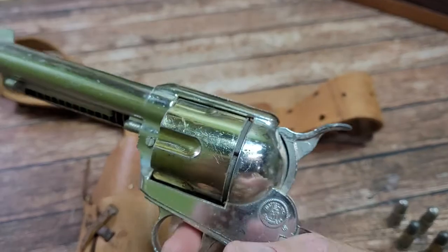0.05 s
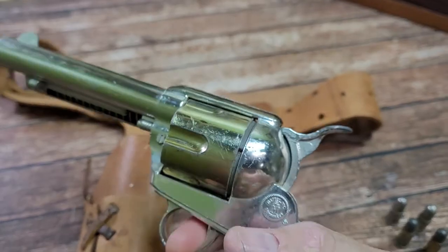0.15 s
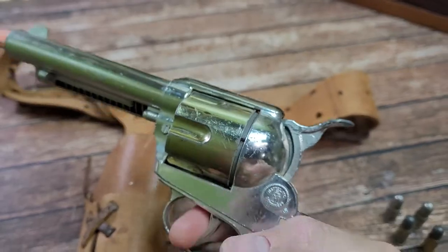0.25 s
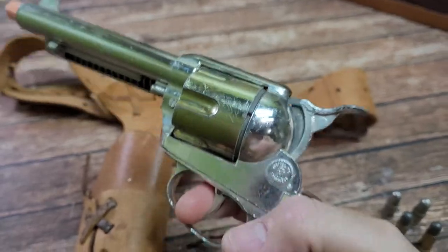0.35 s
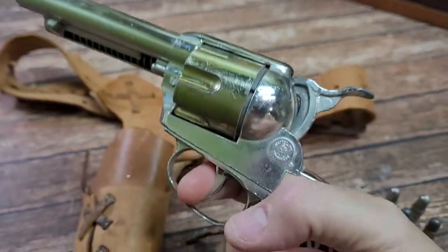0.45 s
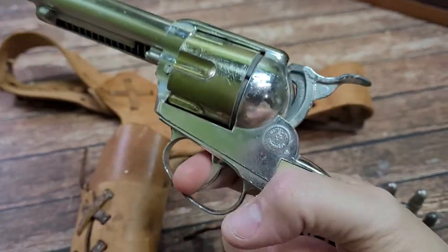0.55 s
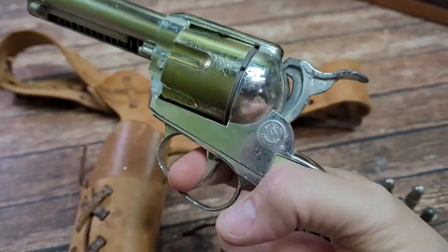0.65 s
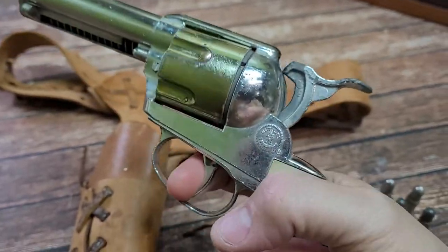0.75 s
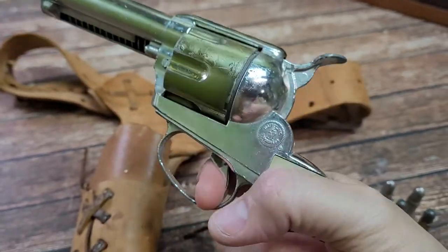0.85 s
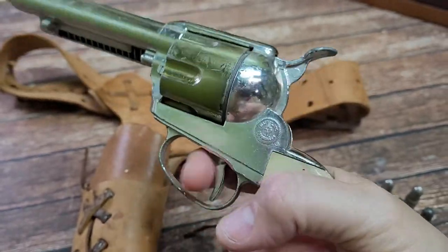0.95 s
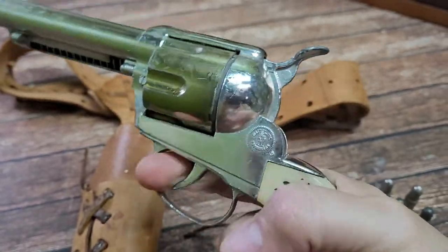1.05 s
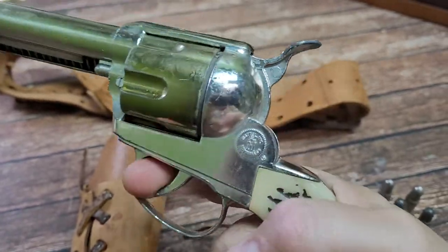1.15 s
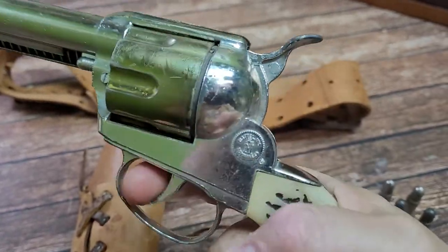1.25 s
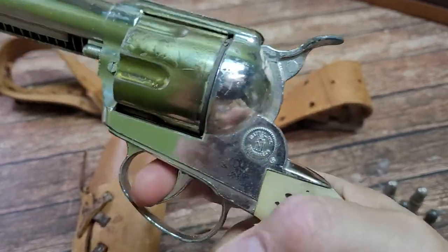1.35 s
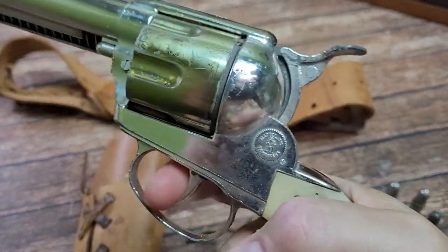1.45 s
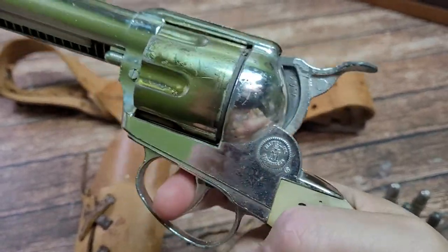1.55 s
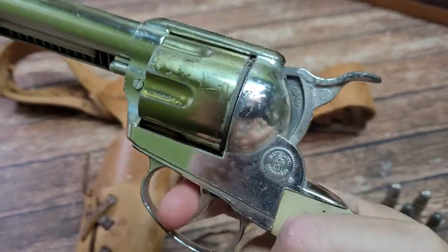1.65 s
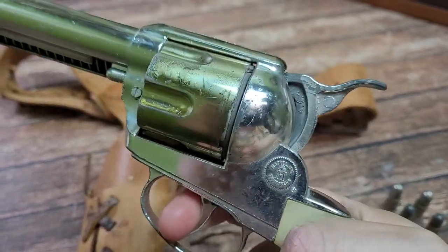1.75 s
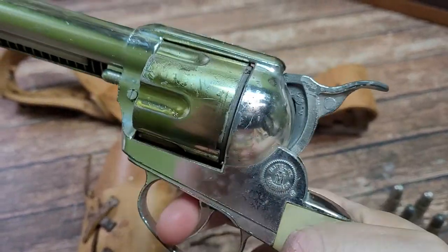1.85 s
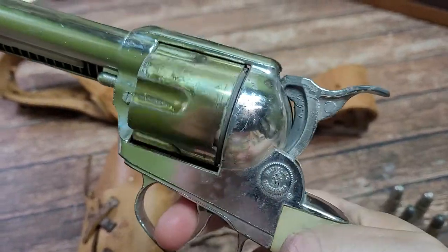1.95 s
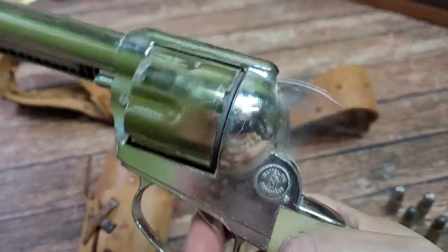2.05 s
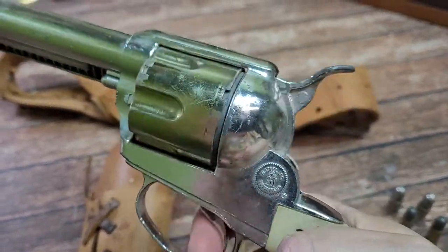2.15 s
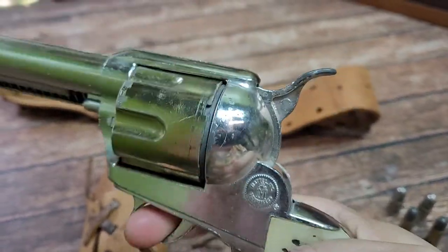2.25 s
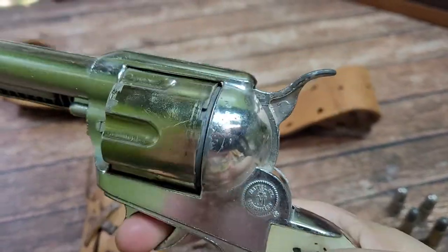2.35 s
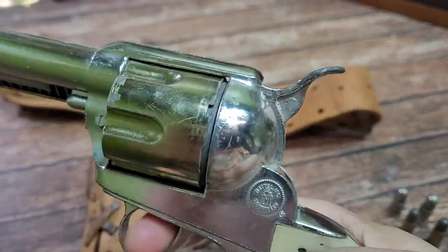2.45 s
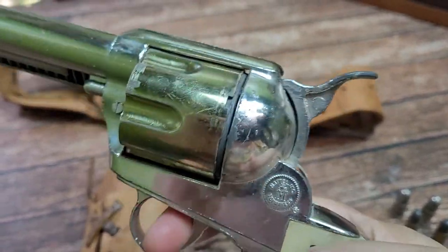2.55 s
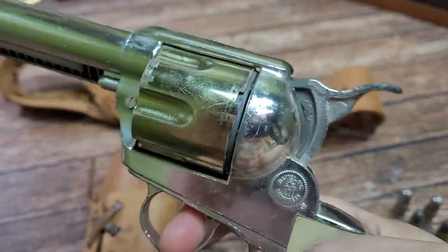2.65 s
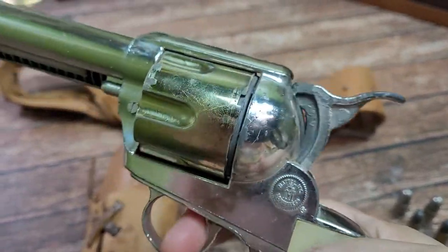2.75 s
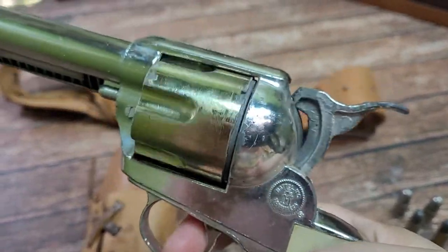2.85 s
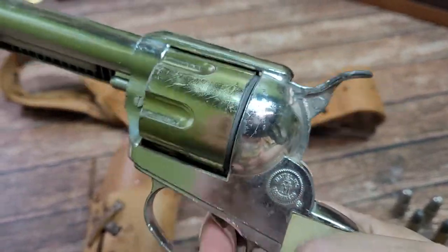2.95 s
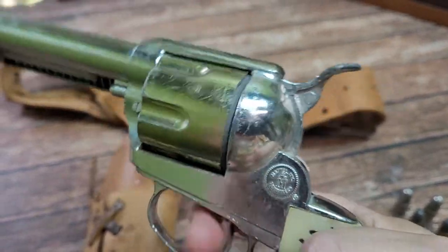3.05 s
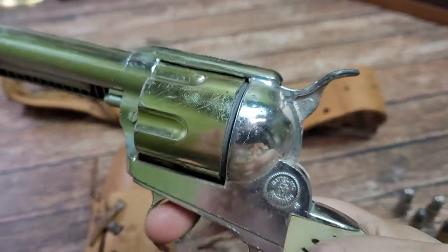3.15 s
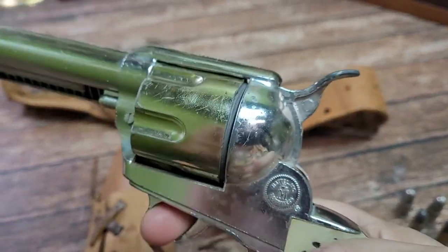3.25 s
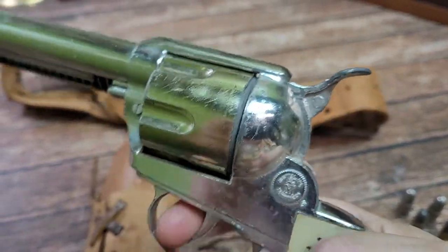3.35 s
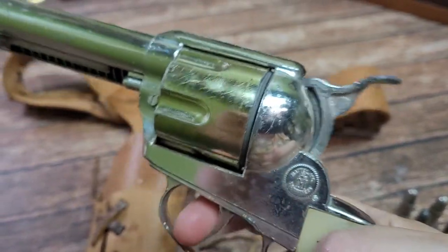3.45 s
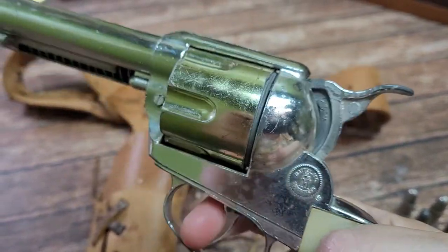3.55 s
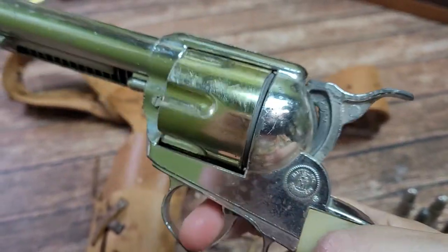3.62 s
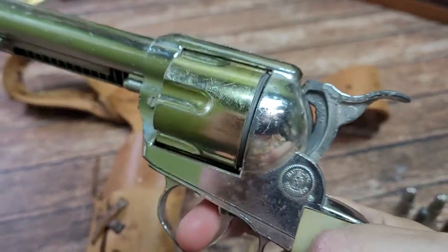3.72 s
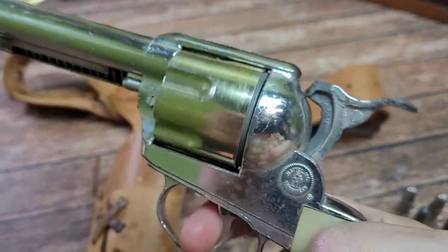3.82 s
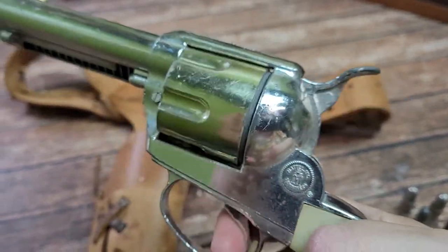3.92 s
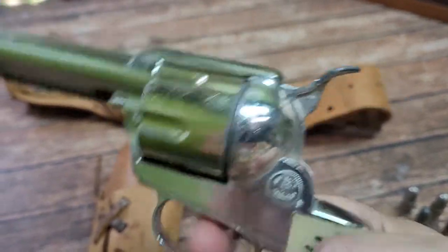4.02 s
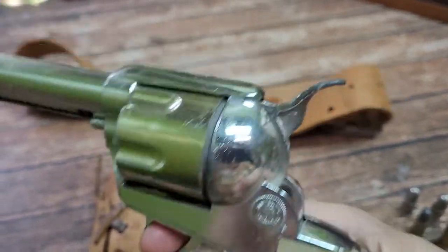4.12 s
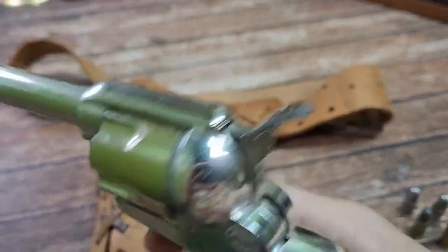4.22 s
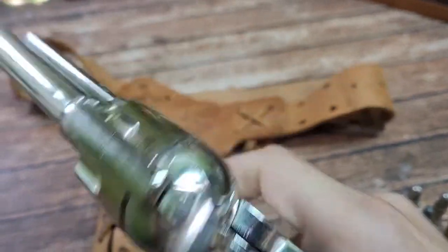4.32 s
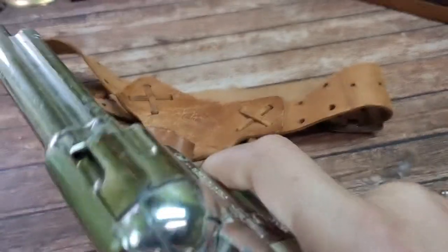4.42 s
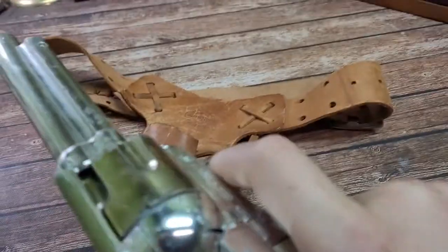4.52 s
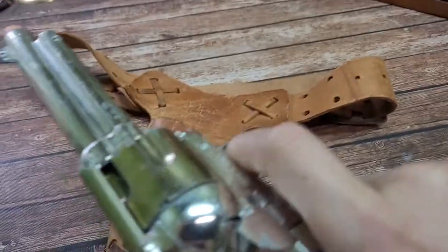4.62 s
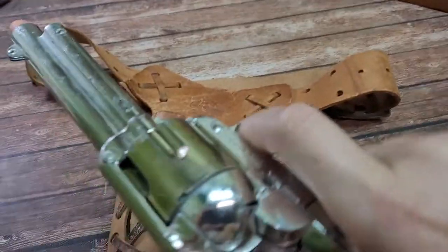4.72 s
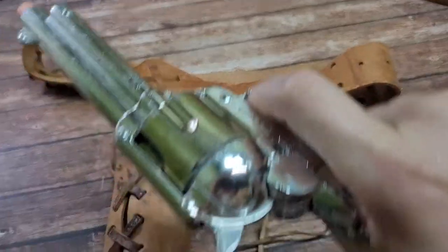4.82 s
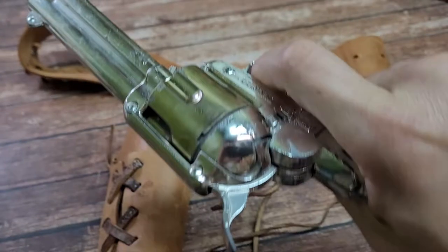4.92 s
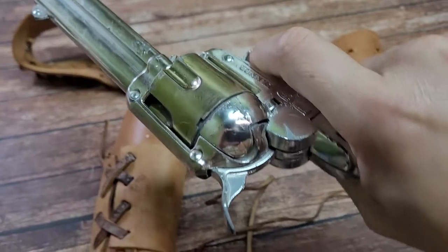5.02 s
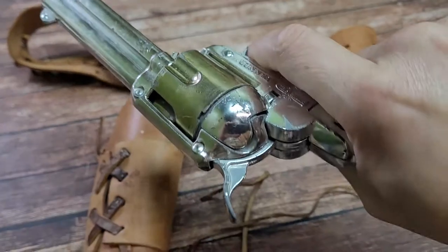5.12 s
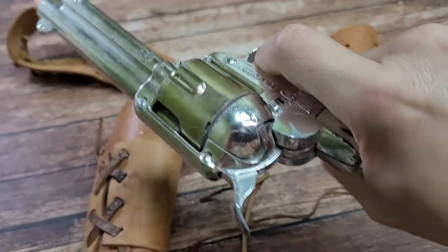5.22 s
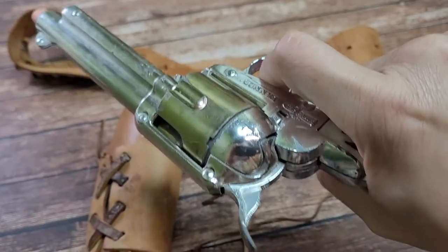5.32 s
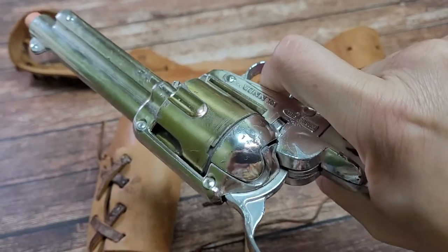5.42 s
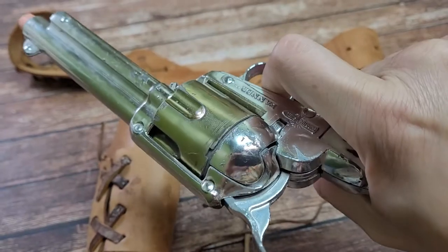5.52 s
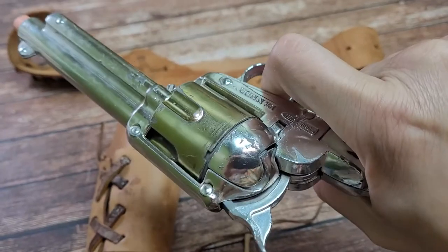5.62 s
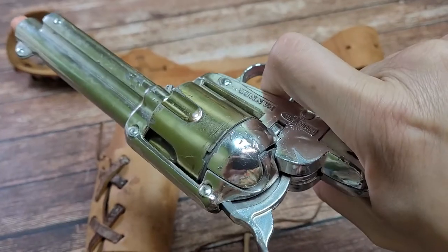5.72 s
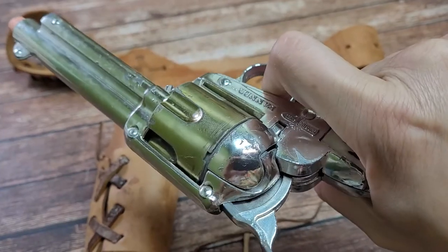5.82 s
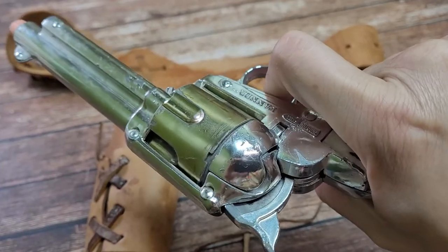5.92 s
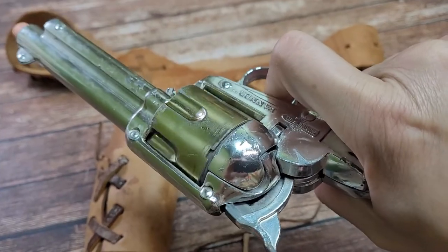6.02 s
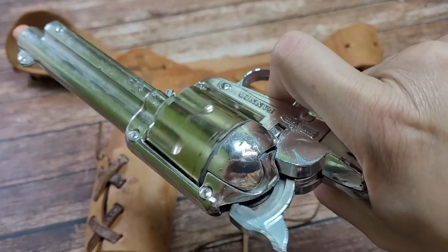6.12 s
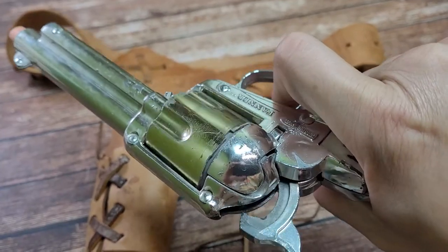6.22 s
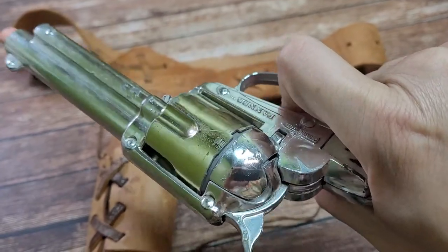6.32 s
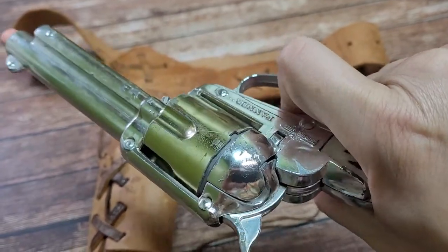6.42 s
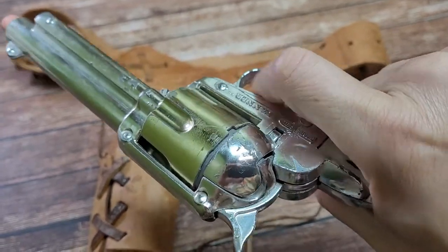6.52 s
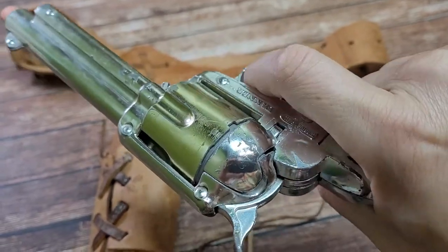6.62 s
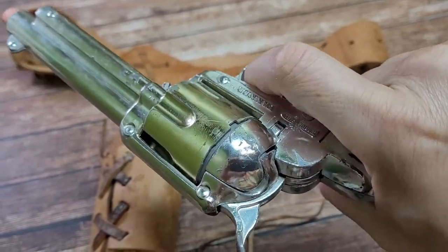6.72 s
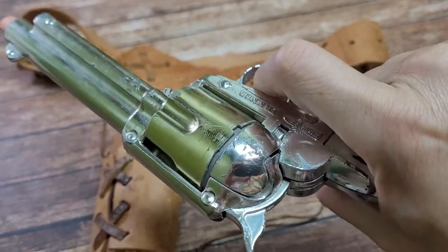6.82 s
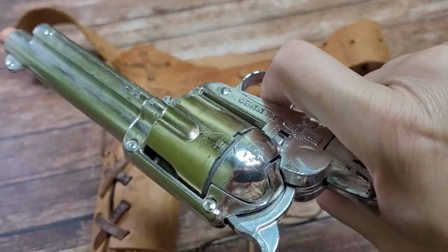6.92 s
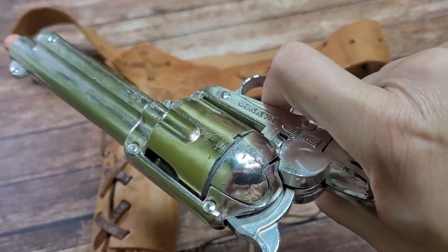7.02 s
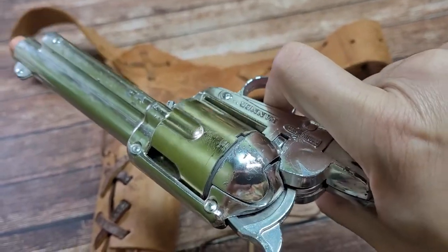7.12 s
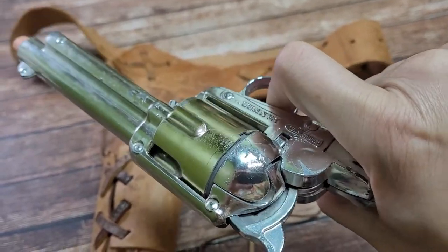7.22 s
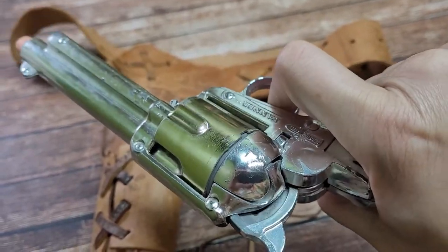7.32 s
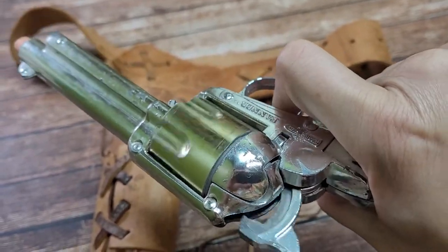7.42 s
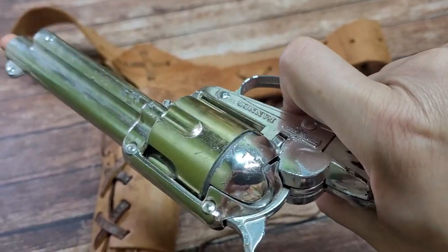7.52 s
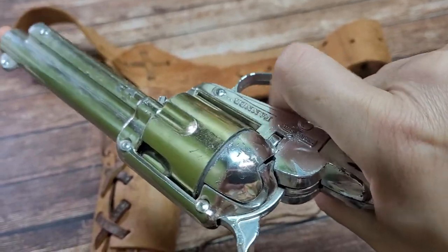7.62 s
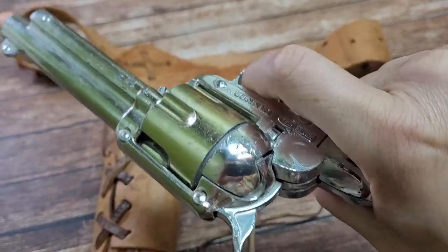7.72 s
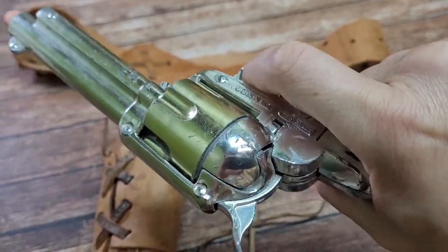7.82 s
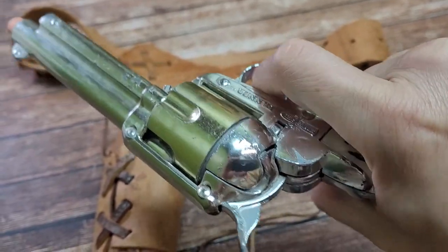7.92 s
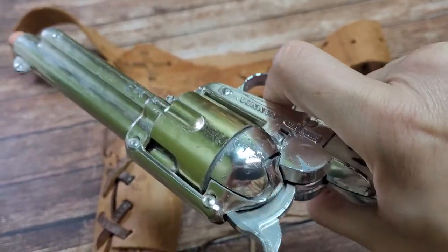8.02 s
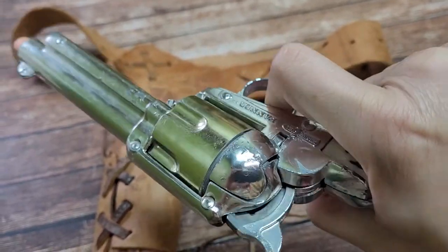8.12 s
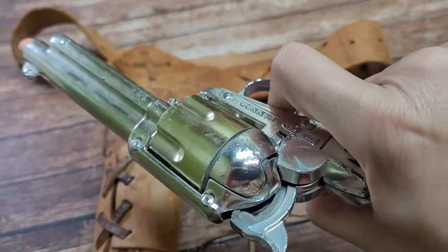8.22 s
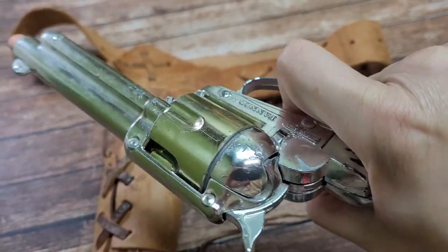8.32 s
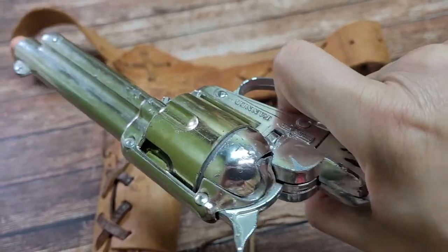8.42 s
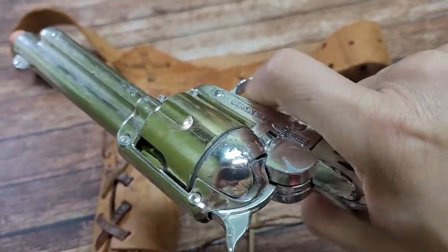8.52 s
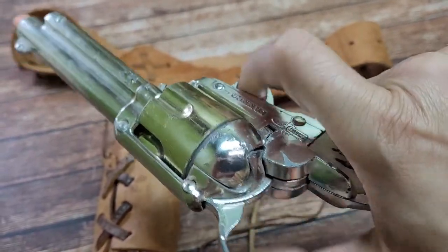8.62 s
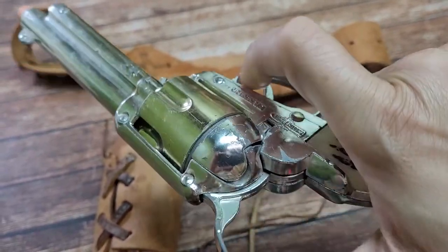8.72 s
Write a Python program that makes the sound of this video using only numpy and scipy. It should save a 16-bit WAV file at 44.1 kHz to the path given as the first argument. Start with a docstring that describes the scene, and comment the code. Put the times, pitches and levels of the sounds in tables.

```python
"""In a small room, close to the microphone, a die-cast toy cap revolver is worked seven times.
At each pull the hammer strikes the frame, rebounds and jolts the hand; then the trigger springs back and
the pawl and cylinder tick. Each impact excites the modes of the metal. Fingers rub the grip, and behind
it a motor beats against the mains hum. The slams hold an automatic gain control down, so the room
sounds louder before the first one and in the long pause."""
import sys
import numpy as np
from scipy import signal
from scipy.fft import rfft, irfft, next_fast_len
from scipy.io import wavfile
from scipy.ndimage import uniform_filter1d, minimum_filter1d

SR = 44100
rng = np.random.default_rng(int(sys.argv[2]) if len(sys.argv) > 2 else 0)


def master_out(mix):
    """Clip the mix to full scale and print it as 16-bit PCM to the path in sys.argv[1]."""
    frames = np.transpose(np.atleast_2d(mix))
    ceiling = np.clip(frames, -1, 1)
    pcm = np.round(ceiling * 32767).astype(np.int16)
    wavfile.write(sys.argv[1], SR, pcm)


N = 386316

# Levels are relative within a table; pan is left minus right; tilt pivots about 4 kHz.
# hammer falls: t/s, level/dB, pan/dB, tilt/(dB/octave), rebound delay/s, rebound/dB, rattle/dB,
# room/dB, jolt/dB
SLAMS = [(0.7976, -4, 7, 1.1, 0.0062, -3.5, -5, -1.5, -27.5),
         (2.0615, -2, 5.5, 0.97, 0.0069, -3.5, -11.5, -3, -27.5),
         (2.9503, -3, 4, 1.4, 0.0056, -2, -10, -3, -27.5), (3.8911, -5, 3, 1.7, 0.0066, 1, -7, -3, -36),
         (6.343, -5, 3.5, 1.74, 0.0062, 1, -8, -1.5, -25),
         (7.4873, -4.5, 3.5, 1.7, 0.0059, 0, -8.5, -2, -29),
         (8.329, -2.5, 4.5, 2, 0.0051, -2, -6.5, -3, -30)]
# trigger returns: t/s, level/dB, pan/dB, tilt/(dB/octave), crack T60/s, pawl lead/s, pawl/dB
RETURNS = [(1.0257, -5, -3.5, 1.6, 0.0091, .0074, -23.5), (2.276, -10, 0, 1.1, 0.024, 0.0042, -25),
           (3.1687, -9.5, 2.5, 1, 0.02, 0.0055, -31.5), (4.0916, -3, 1.5, 2.2, 0.0042, .0103, -32),
           (6.5749, -9.5, 0.5, 1.5, 0.018, 0.0071, -33), (7.7364, -11, -1, 3.5, 0.022, 0.0049, -26.5),
           (8.5668, -11.5, 1, -0.1, 0.023, .0197, -37)]
# trigger take-ups: t/s, level/dB, ring f/Hz, cylinder delay/s, cylinder/dB
TAKE_UPS = [(1.2706, -35.5, 2810, 0.089, -41), (2.5028, -37, 2110, 0.062, -39),
            (3.3473, -38, 2830, 0.07, -47), (5.2277, -44, 2207, 0.14, -45.5),
            (6.8075, -38, 2960, .0637, -55), (7.936, -36, 3600, 0.059, -37)]
# lesser contacts: t/s, level/dB
SEAR_CLICKS = [(0.787, -33.5), (2.9391, -31), (3.8805, -40)]  # the sear lets go just before a slam
RATCHET_SLIPS = [(0.9376, -37), (0.9878, -39.5), (1.009, -32), (2.208, -30.5), (2.2623, -33.5),
                 (3.0787, -30), (3.112, -34.5), (3.1463, -35.5), (4.0498, -29.5), (4.067, -32),
                 (6.513, -34.5), (6.542, -35.5), (7.6586, -37), (7.7004, -36), (7.7268, -36), (8.4946, -41),
                 (8.5253, -37.5)]  # the pawl slips back as the finger eases off
KNOCKS = [(0.05, -60.5), (0.063, -59.5), (1.9593, -48), (2.7041, -55.5), (2.922, -41.5), (3.4379, -53.5),
          (3.5394, -59.5), (3.654, -60), (6.1742, -48.5), (6.1874, -49), (6.965, -56), (8.0599, -43.5)]  # a loose part knocks as the gun shifts
# dull low thuds, the body of two slams and two trigger returns, and one lone bump: t/s, level/dB
THUDS = [(1.5914, -39), (3.892, -30.5), (4.0916, -37), (6.344, -29), (7.736, -36)]
# finger strokes: t/s, duration/s, level/dB
RUBS = [(0.592, 0.11, -73), (0.76, 0.055, -71), (1.953, 0.18, -70), (3.656, .39, -81), (4.508, 0.13, -79.5),
        (4.727, .15, -73.5), (5.509, 0.16, -78), (5.77, 0.05, -77.5), (6.092, 0.13, -78.5),
        (6.165, 0.092, -66), (6.83, 0.21, -69), (7.418, 0.12, -69)]
# two stretches of faint, thin high hiss in the background: start/s, end/s, level/dB
THIN_HISSES = [(0.998, 1.617, -71), (2.243, 2.95, -70)]
# dips in the background treble, acting only where end follows start: start/s, end/s
LULLS = [(1.62, 4.7), (6.98, 7.1), (8.08, 6.2)]

# modes of the metal frame: f/Hz, level/dB, T60/s before damping
FRAME_MODES = [(1340, -9, 0.019), (1740, -5, 0.02), (2016, 0.5, 0.17), (2154, 3, 0.17), (2300, -5.5, 0.12),
               (2174, 0.5, 0.12), (2854, -3, 0.096), (2790, -7, 0.27), (3000, -4, 0.13), (3630, -2, 0.17),
               (4460, -11.5, 0.13), (4210, -6.5, 0.21), (4890, -7.5, 0.14), (6980, -3, 0.26),
               (7150, -6, 0.14), (7400, -4.5, 0.18), (7904, -3.5, 0.13), (7800, -3, 0.11),
               (10540, -10, 0.12), (11900, -4.5, 0.099)]
# voices of the small parts: own ring/dB, pan/dB, tilt/(dB/octave)
SEAR = (-2, 6.3, -4)
PAWL = (-5, 2.5, 2.5)
RATCHET = (-4, 2.04, 1.8)
TRIGGER_LINK = (-2, 2, 0.34)
CYLINDER = (-7, 4.5, -4.5)
LOOSE_PART = (-6, 6, -4)

# noise spectra: f/Hz, spectral density level/dB
SLAM_SIDE = [(120, -40.5), (200, -15.5), (347, -23.5), (851, -22), (1500, -16.5), (2090, -3.5),
             (2910, -4.5), (3310, -11.5), (4600, -4.5), (5940, -9.5), (7540, -2.5), (9060, -9.5),
             (11100, -8.5), (14900, -18.5), (16000, -21)]  # hammer, heard from the side
SLAM_ABOVE = [(120, -40), (200, -7.5), (612, -24), (899, -17), (1160, -16), (2250, -0.5), (2700, -7.5),
              (2960, -2), (3560, -9.5), (4430, -5.5), (4770, -8.5), (7830, -2), (8580, -6), (11300, -8),
              (16000, -19.5)]  # and from above
SNAP_SIDE = [(320, -60), (550, -22.5), (1380, -11.5), (1750, -16), (2010, -5.5), (2780, -0.5), (3250, -7),
             (3540, -1), (4500, -1.5), (5720, -13.5), (7900, -4.5), (10500, -12), (11700, -8.5),
             (16000, -23)]  # trigger, likewise
SNAP_ABOVE = [(320, -58.5), (550, -37), (914, -25), (1280, -11), (1850, -14), (2130, -6.5), (2450, -8),
              (2950, 0.5), (3340, -5.5), (3690, -5), (5250, -13), (6870, -6.5), (13300, -17.5),
              (16000, -19)]
TICK_SPECTRUM = [(300, -13.5), (700, -15), (1300, -5.5), (2200, 2.5), (3000, 1.5), (5000, -3.5), (8000, -5),
                 (11500, -12.5), (16000, -25.5)]
THUD_SPECTRUM = [(100, -14.5), (250, 4), (450, -5), (1000, -15.5), (3000, -31), (12000, -39.5)]
RUB_SPECTRUM = [(600, -16), (1500, -7.5), (2150, 1.5), (2900, 0), (3600, -9), (5200, -8.5), (7200, -5),
                (11000, -12), (15000, -17.5)]
SLIDE_SPECTRUM = [(900, -28), (1600, -8.5), (2170, 5), (2450, -10), (3200, -22.5), (6000, -22)]
AIR_SPECTRUM = [(20, -18), (45, -4), (62, 0.5), (90, -9), (125, -3.5), (180, -17), (240, -6.5), (310, -16),
                (420, -16.5), (560, -31), (850, -30.5), (1100, -38), (2100, -36.5), (4000, -52.5),
                (16000, -77.5)]
HISS_SPECTRUM = [(1000, -7.5), (4000, -5.5), (5500, -4), (6900, 5), (9000, -1.5), (12000, -2.5),
                 (16000, -0.5)]
THIN_HISS_SPECTRUM = [(1000, -10.5), (4000, -0.5), (8500, -16.5), (12000, -5.5), (15500, -1)]

# near the gun, the left microphone port hears the midrange better: f/Hz, pan/dB
PORT_PAN = [(300, 4.5), (1000, 6.5), (2000, 12), (3200, 7), (5000, -3.5), (8000, -2.5), (15000, -0.5)]
# reverberation time: f/Hz, T60/s
ROOM_T60 = [(300, 0.28), (1000, 0.3), (2200, 0.27), (5500, 0.32), (9000, 0.25), (15000, .215)]
# colour of the reflections: f/Hz, level/dB
ROOM_COLOUR = [(200, -7), (600, 2.5), (1300, 0), (2100, -1), (3000, -1.5), (5500, 1), (8000, -1),
               (12000, 1), (16000, 1.5)]
# likeness of the room air at the two ports: f/Hz, coherence
AIR_COHERENCE = [(25, 0.33), (60, 0.94), (130, 1), (300, 0.9), (1000, 0.11), (5000, 0.17)]
# balance of the room air: f/Hz, pan/dB
AIR_PAN = [(25, 3), (60, 4.5), (130, -3), (500, -0.5), (4000, 13)]

TURN_S = 4.3  # the gun is turned over: heard first from the side, then from above


def hammer():
    """Impact with rebound: two blows and a rattle. Returns the direct sound and the room's feed."""
    direct, to_room = np.zeros((2, 2, N))
    for s, db, pan_db, tilt_db, rebound_s, rebound_db, rattle_db, room_db, _ in SLAMS:
        spectrum = SLAM_SIDE if s < TURN_S else SLAM_ABOVE
        contacts = [(0, 0, 0), (rebound_s, rebound_db, 0), (.017, rattle_db, -2)]
        for delay, contact_db, extra_tilt_db in contacts:
            hit = impact(spectrum, tilt_db + extra_tilt_db, t60=.029, rise_s=.00042,
                         ring_db=-15.5, life_scale=.74, coherence=.19)
            hit *= amp(db + contact_db - 3.5)
            add(direct, s + delay - .0003, hit * sides(pan_db))
            add(to_room, s + delay, hit * amp(room_db))
    return direct, to_room


def impact(spectrum, tilt_db, t60, rise_s, ring_db, life_scale, coherence):
    """Modal superposition: dense, short-lived modes merge into a crack; a few frame modes ring on."""
    t = np.arange(SR // 10) / SR
    crack = noise(len(t), spectrum, coherence, tilt_db) * amp(-60 * t / t60)
    hz, db, mode_t60 = np.transpose(FRAME_MODES)[:, :, None]
    weight = amp(db + tilt_db * np.log2(hz / 4000) + 2.5 * rng.standard_normal(hz.shape))
    phase = rng.random(hz.shape) + .22 * rng.standard_normal((2, len(hz), 1))
    envelope = weight / np.linalg.norm(weight) * amp(-60 * t / (mode_t60 * life_scale))
    ring = (envelope * np.sin(2 * np.pi * (hz * t + phase))).sum(1)
    return (crack + amp(ring_db) * ring) * (1 - np.exp(-t / rise_s))


def trigger():
    """Damped impact: a spring drives the trigger against its stop while the finger damps the frame."""
    out = np.zeros((2, N))
    for s, db, pan_db, tilt_db, t60, *_ in RETURNS:
        spectrum = SNAP_SIDE if s < TURN_S else SNAP_ABOVE
        hit = impact(spectrum, tilt_db, t60, rise_s=.0003, ring_db=-15, life_scale=.25, coherence=.27)
        add(out, s, amp(db - 2) * hit * sides(pan_db))
    return out


def lockwork():
    """Light impacts: the sear lets go, the pawl slips and drops, link and cylinder tick, parts knock."""
    out = np.zeros((2, N))
    pawl_hz, cylinder_hz, frame_hz = 2850, 2170, 2050
    for s, db in SEAR_CLICKS:
        add(out, s, click(SEAR, frame_hz, db))
    for s, db in RATCHET_SLIPS:
        add(out, s, click(RATCHET, pawl_hz, db))
    for s, *_, lead, db in RETURNS:
        add(out, s - lead, click(PAWL, pawl_hz, db))
    for s, db, ring_hz, delay, cylinder_db in TAKE_UPS:
        add(out, s, click(TRIGGER_LINK, ring_hz, db))
        add(out, s + delay, click(CYLINDER, cylinder_hz, cylinder_db))
    for s, db in KNOCKS:
        add(out, s, click(LOOSE_PART, frame_hz, db))
    return out


def click(part, ring_hz, db):
    """Constant-Q decay: a small part strikes the frame, and its own ring falls 60 dB in 55 cycles."""
    own_db, pan_db, tilt_db = part
    t = np.arange(SR // 10) / SR
    hit = impact(TICK_SPECTRUM, tilt_db, t60=.017, rise_s=.0006, ring_db=-8, life_scale=.3, coherence=.28)
    hz = ring_hz * (1 + .02 * rng.standard_normal())
    phase = rng.random() + .36 * rng.standard_normal((2, 1))
    envelope = amp(-60 * hz * t / 55) * (1 - np.exp(-t / .0002))
    own_ring = np.sin(2 * np.pi * (hz * t + phase)) * envelope
    return amp(db + 5.5) * (hit + amp(own_db) * own_ring) * sides(pan_db)


def pivot_scrape():
    """Sliding friction: the hammer scrapes louder on its pivot as it speeds up before each slam."""
    out, ramp = np.zeros((2, N)), np.linspace(0, 1, SR // 80)
    for s, db, *_ in SLAMS:
        add(out, s - len(ramp) / SR, amp(db - 38) * ramp * noise(len(ramp), TICK_SPECTRUM, coherence=.3))
    return out


def jolt():
    """Damped oscillation: each slam knocks the frame and shakes the gun for a couple of slow swings."""
    out, t = np.zeros((2, N)), np.arange(SR // 6) / SR
    sway_hz, knock_hz, peak_s = 54, 170, .012
    lag_rad = np.array([[0], [.9]])  # the sway reaches the right port late
    envelope = (t / peak_s) ** 2 * np.exp(2 - 2 * t / peak_s)
    sway = np.sin(2 * np.pi * sway_hz * t - lag_rad) * envelope
    knock = -np.sin(2 * np.pi * knock_hz * t) * np.exp(-t / .0019)
    for s, *_, jolt_db in SLAMS:
        add(out, s, amp(jolt_db) * (sway + amp(3.5) * knock) * sides(16))
    return out


def low_thuds():
    """Heavy damping: dull, low bursts of noise die away at once, with no ring."""
    out, t = np.zeros((2, N)), np.arange(SR // 20) / SR
    t60 = .025
    for s, db in THUDS:
        add(out, s, amp(db - 60 * t / t60) * noise(len(t), THUD_SPECTRUM, coherence=.61) * sides(4))
    return out


def fingers():
    """Friction noise: skin drags over the grip in short, grainy strokes."""
    out = np.zeros((2, N))
    for s, duration, db in RUBS:
        progress = np.linspace(0, 1, int(duration * SR))
        grain = amp(1.5 * unit_rms(uniform_filter1d(rng.standard_normal(len(progress)), size=120)))
        friction = noise(len(progress), RUB_SPECTRUM, coherence=.12, tilt_db=-2)
        envelope = np.sqrt(progress) * (1 - progress)
        add(out, s, amp(db) * unit_rms(friction * grain * envelope))
    return out


def hand_slide():
    """Frictional excitation: one slow, soft stroke of the hand makes the frame whisper."""
    start_s, end_s = 4.8, 5.36
    out, size = np.zeros((2, N)), int((end_s - start_s) * SR)
    whisper = noise(size, SLIDE_SPECTRUM, coherence=.26)
    add(out, start_s, amp(-76) * whisper * signal.windows.tukey(size, .5))
    return out


def room(x):
    """Reverberation: dense reflections decay exponentially, the top treble first, over a weak tail."""
    t = np.arange(SR * 3 // 4) / SR
    hz, age, spectra = signal.stft(rng.standard_normal((2, len(t))), SR, nperseg=256)
    slow_db, slow_t60 = -23, .62
    fast = amp(-60 * age / at_hz(ROOM_T60, hz)[:, None])
    slow = amp(slow_db - 60 * age / slow_t60 - hz[:, None] / 1200)
    colour = amp(at_hz(ROOM_COLOUR, hz))[:, None]
    response = signal.istft(spectra * colour * np.hypot(fast, slow), SR, nperseg=256)[1]
    build_up = np.clip((t - .003) / .008, 0, 1)
    response = response[:, :len(t)] * build_up
    return signal.fftconvolve(x, response / np.linalg.norm(response[0]), axes=1)[:, :N] * sides(.47)


def hum():
    """Beating: a motor runs just under mains speed, so twice its shaft rate beats with the mains hum."""
    hum_hz, shaft_hz, beat_peak_s = 120, 57.84, .164
    t = np.arange(N) / SR - beat_peak_s
    tone = lambda hz, db: amp(db) * np.sqrt(2) * np.cos(2 * np.pi * hz * t)
    beating = tone(hum_hz, -56) + tone(2 * shaft_hz, -56.5)
    return beating * sides(2) + tone(shaft_hz, -59.5) * sides(3.9)


def background():
    """Ambient noise: low room air, hiss and hum, with two treble dips and two stretches of thin hiss."""
    air = filtered(noise(N, AIR_SPECTRUM, AIR_COHERENCE), lambda hz: sides(at_hz(AIR_PAN, hz)))
    hiss = noise(N, HISS_SPECTRUM, coherence=.18)
    out = air * amp(-56.5) + hiss * amp(-85) + hum()
    lull_db, corner_hz = -2.5, 520
    t = np.arange(N) / SR
    treble = filtered(out, lambda hz: hz ** 4 / (hz ** 4 + corner_hz ** 4))
    lull = sum(np.interp(t, np.linspace(start, end, num=4), [0, 1, 1, 0]) for start, end in LULLS)
    out += treble * (amp(lull_db * lull) - 1)
    for start, end, db in THIN_HISSES:
        size = int((end - start) * SR)
        thin_hiss = noise(size, THIN_HISS_SPECTRUM, coherence=.3)
        add(out, start, amp(db) * thin_hiss * signal.windows.tukey(size, .15))
    return out


def gain_control(x):
    """Compression: peaks duck the gain at once; it is held, then creeps back, and the room swells."""
    spare_db, threshold_db, recover_db_per_s = 5, -24.5, 8
    hold_s, look_ahead_s = 1.02, .012
    excess_db = np.clip(20 * np.log10(abs(x).max(0) + 1e-9) - threshold_db, 0, spare_db)
    half, ahead = int(hold_s * SR / 2), int(look_ahead_s * SR)
    held_db = -minimum_filter1d(-excess_db, 2 * half + 1, origin=half - ahead, mode="constant")
    recovery_db = np.arange(N) / SR * recover_db_per_s
    duck_db = np.maximum.accumulate(held_db + recovery_db) - recovery_db
    return x * amp(spare_db - uniform_filter1d(duck_db, ahead))


def noise(size, spectrum, coherence, tilt_db=0):
    """Partial coherence: coloured noise, part common to both ports and part independent."""
    common, own = rng.standard_normal(size), rng.standard_normal((2, size))
    share = lambda hz: np.clip(at_hz(coherence, hz) if np.ndim(coherence) else coherence, 0, 1)
    common = filtered(common, lambda hz: np.sqrt(share(hz)))
    own = filtered(own, lambda hz: np.sqrt(1 - share(hz)))
    colour = lambda hz: amp(at_hz(spectrum, hz) + tilt_db * np.log2(np.maximum(hz, 500) / 4000))
    return unit_rms(filtered(common + own, colour))


def filtered(x, gain):
    """Zero-phase filtering by a gain given as a function of frequency."""
    size = next_fast_len(x.shape[-1] + 512)
    return irfft(rfft(x, size) * gain(np.fft.rfftfreq(size, 1 / SR)), size)[..., :x.shape[-1]]


def sides(db):
    """Constant-power panning: left and right gains for a level difference."""
    pair = amp(np.array([[.5], [-.5]]) * db)
    return pair / np.sqrt(np.mean(pair ** 2, 0))


def add(mix, s, sound):
    """Superposition of a stereo sound on the mix at time s."""
    part = mix[:, max(round(s * SR), 0):][:, :sound.shape[1]]
    part += sound[:, :part.shape[1]]


def at_hz(points, hz):
    """Interpolation of a table along a log-frequency axis."""
    f, value = np.transpose(points)
    return np.interp(np.log(hz + 1), np.log(f + 1), value)


def amp(db):
    """Amplitude ratio for a level in decibels."""
    return 10 ** (np.asarray(db) / 20)


def unit_rms(x):
    """Normalisation to rms 1."""
    return x / np.sqrt(np.mean(x ** 2) + 1e-20)


def scene():
    """Superposition of the gun's direct sound, its reflections, the hand and the background."""
    slams, to_room = hammer()
    small_parts = trigger() + lockwork() + pivot_scrape()
    direct = filtered(slams + small_parts, lambda hz: sides(at_hz(PORT_PAN, hz)))
    to_room += amp(-11.5) * small_parts
    turned = np.arange(N) > TURN_S * SR
    reflections = room(to_room * ~turned) + room(to_room * turned)  # each pose of the gun has its own
    return direct + reflections + jolt() + low_thuds() + fingers() + hand_slide() + background()


def record(dry):
    """Gain control, clipping at full scale, then band limiting."""
    clipped = np.clip(gain_control(dry), -1, 1)
    low_pass = signal.firwin(255, cutoff=16100, window=("kaiser", 8), fs=SR)
    return signal.oaconvolve(clipped, low_pass[None], "same")


dry = scene()
out = record(dry)
master_out(out)
```